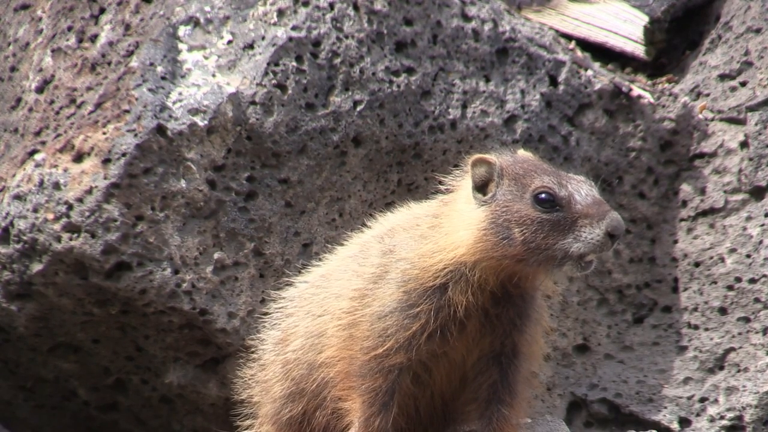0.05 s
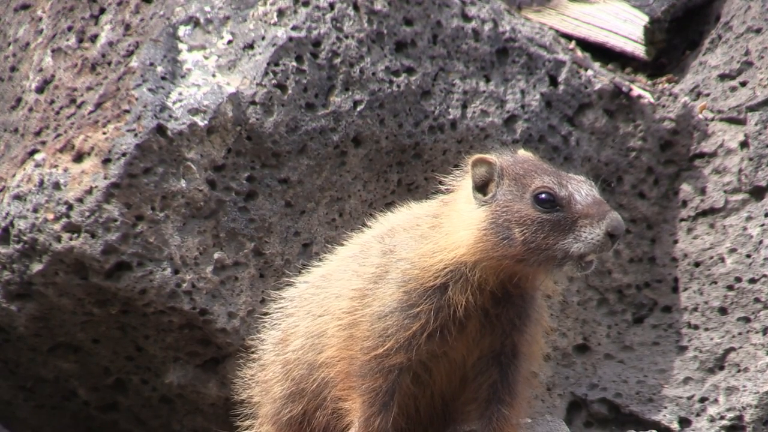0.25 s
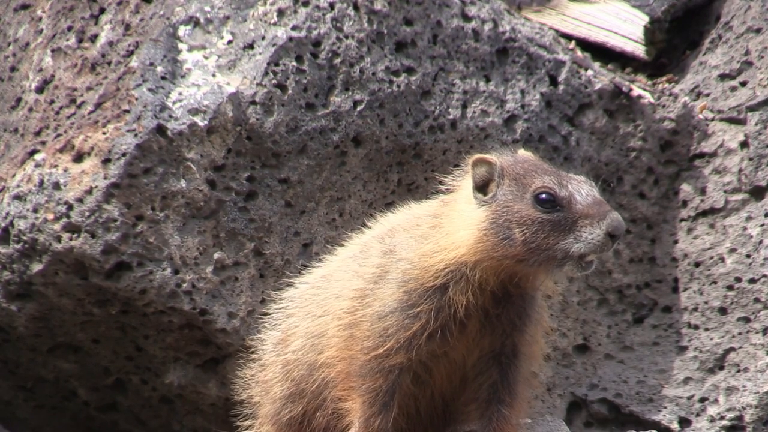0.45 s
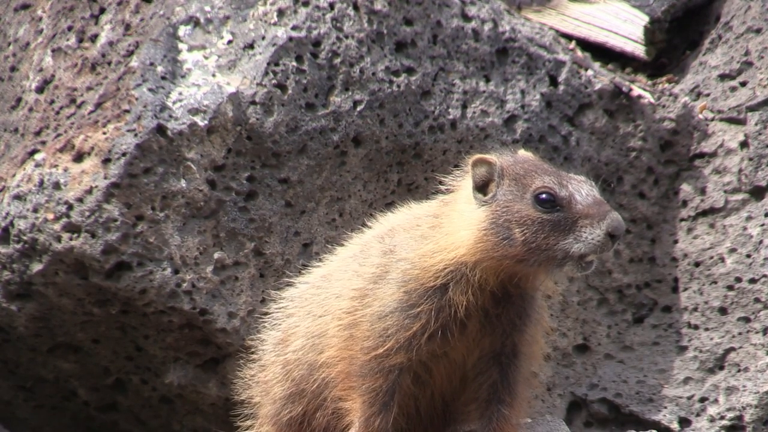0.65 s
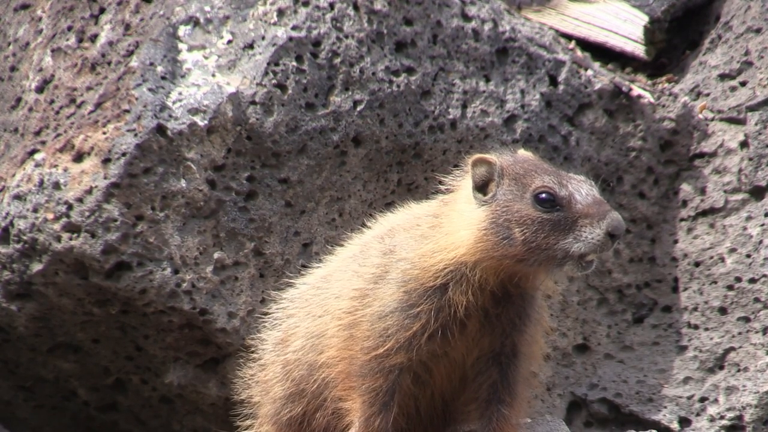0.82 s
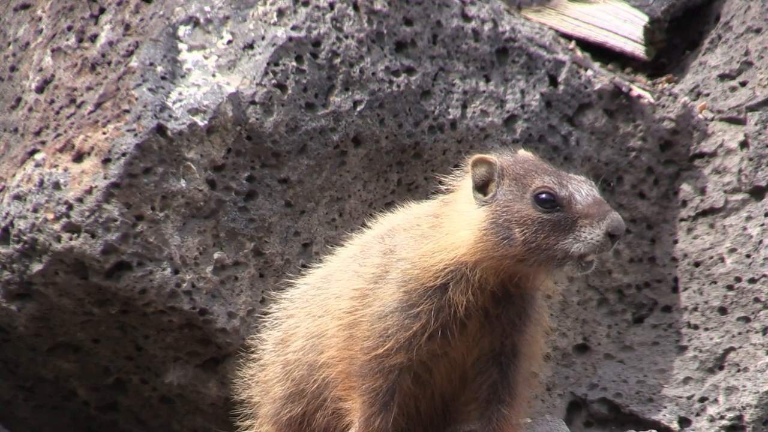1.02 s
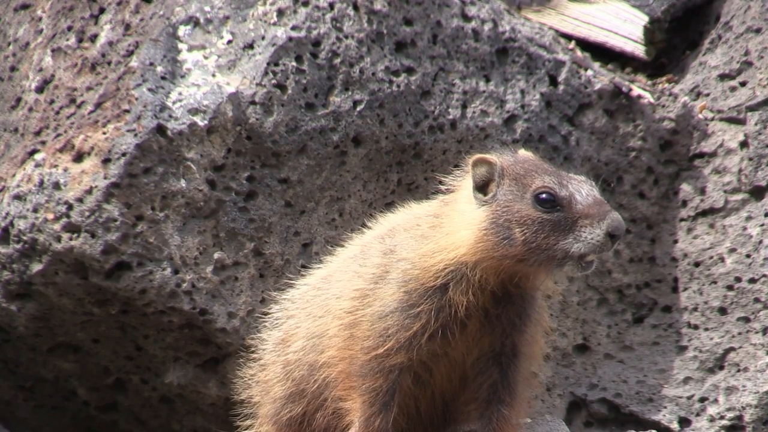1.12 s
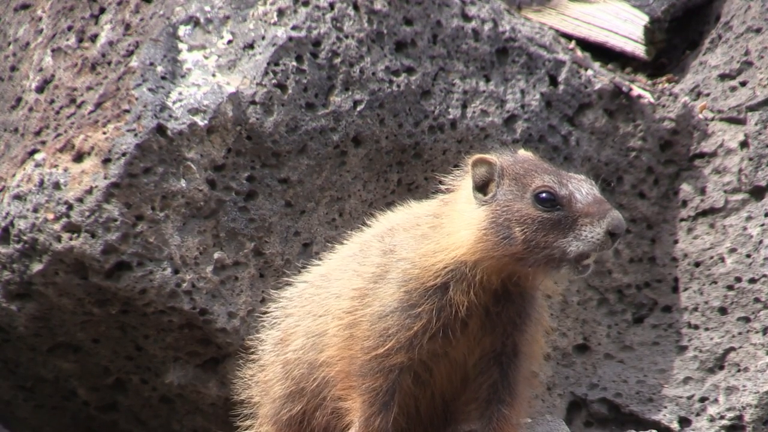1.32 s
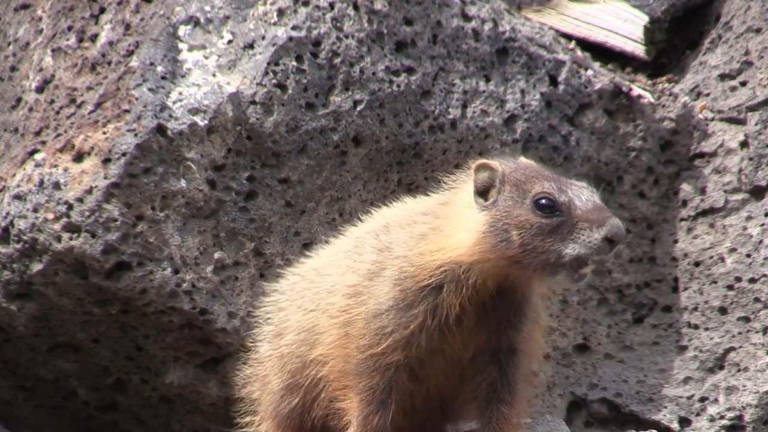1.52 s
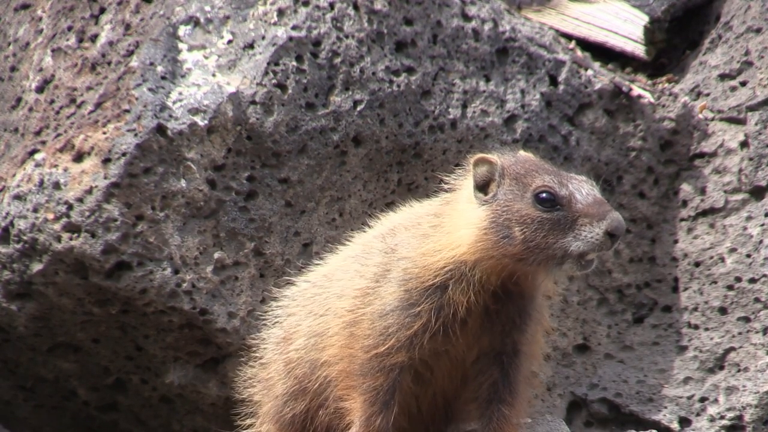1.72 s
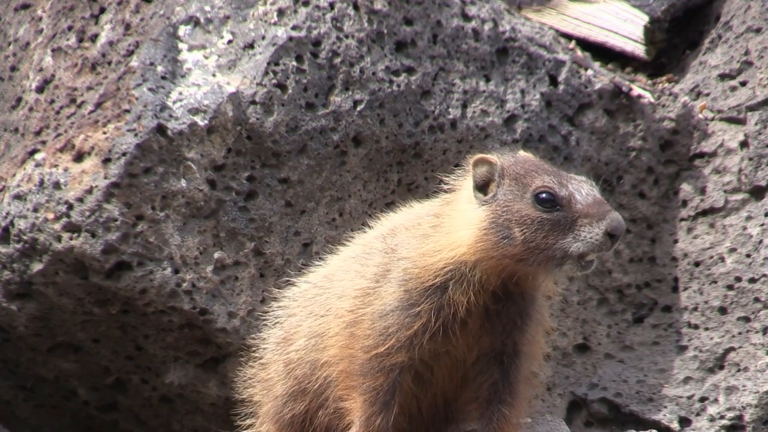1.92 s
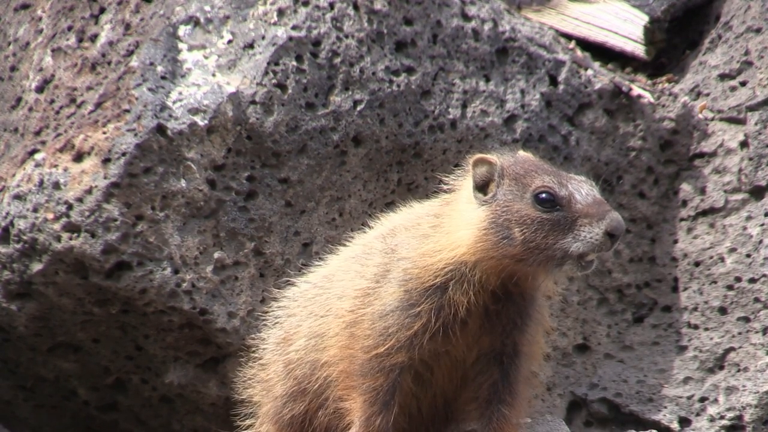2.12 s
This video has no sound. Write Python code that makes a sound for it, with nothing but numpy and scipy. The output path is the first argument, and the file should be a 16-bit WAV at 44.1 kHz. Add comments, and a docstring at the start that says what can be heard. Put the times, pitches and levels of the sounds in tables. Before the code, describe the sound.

A marmot's single piercing alarm chirp at about 1.67 s, only a twentieth of a second long, high then plunging in pitch, with echoes from rocks and slopes fading quickly. From 0 s, low wind buffets the microphone, gusting around 0.3 and 1.0-1.5 s, then easing. Faint distant birds pipe and twitter during the first second, over soft rustle, faint low hoots, a thin motor whine and steady hiss mostly on the right.

```python
"""Wind rumbles on the microphone from the start, as low noise shaped by a gust curve, over a far rustle
of noise bands, a camera motor's steady tones, and faint far bird notes and low hoots made of gliding sines.
Near 1.67 s a marmot on lava rocks gives one sharp whistled chirp: three harmonics and breath noise.
Its echoes from rocks, slopes and valley follow, by convolution with pulses and decaying noise.
The left channel passes through a gain control; the open right input only hisses throughout."""
import sys
import numpy as np
from scipy import signal
from scipy.fft import rfft, irfft
from scipy.io import wavfile
from scipy.ndimage import uniform_filter1d

SR = 44100
rng = np.random.default_rng(int(sys.argv[2]) if len(sys.argv) > 2 else 0)


def waveform_to_disk(signal):
    """Save audio, clipped to [-1, 1], as 16-bit WAV at the path in sys.argv[1]."""
    frames = np.transpose(np.atleast_2d(signal))
    scaled = np.clip(frames, -1, 1) * 32767
    samples = np.round(scaled).astype(np.int16)
    wavfile.write(sys.argv[1], SR, samples)


N = 94815

HISS_DB, HISS_BASS_DB, HISS_BASS_HZ = -58, -76.5, 45  # white part, bass part (both rms), bass upper edge
WHINE_WAVER_DB = -2  # dB per unit of drift
NOISE_LEVEL_VARIATION_DB = 1.2  # slight level variation of the noise bands
AIR_FOLLOWS_WIND, AIR_LAG_S = 0.22, .3  # dB of rustle per dB of slow wind; averaging time
WIND_LUMPS_DB = 2.5  # level variation of the rumble bands
WIND_BRIGHTENS, WIND_SPLIT_HZ = 0.13, 69  # extra dB of the upper rumble per dB of gust; where it begins
WIND_PORT_DB = 11.5  # sensitivity of the capsule to wind
PIPING_FLUTTER_DB, PIPING_TAIL_DB, PIPING_TAIL_T60_S = 1.5, -2, 1.2
SONG_FLUTTER_DB, SONG_BEND = 4, .05
SCATTER_DB, SCATTER_T60_S, SCATTER_ONSET_S = -15, .055, .005
VALLEY_DB, VALLEY_T60_S, VALLEY_ONSET_S = -32.5, 0.86, .03
AIR_DB_PER_S_AT_10K = 68  # treble lost on the way
ECHO_PEAK_HZ, ECHO_PEAK_WIDTH_HZ, ECHO_PEAK_DB = 4400, 400, 3  # slopes return the top of the whistle best
ECHO_LOW_HZ = 2900  # lower pitches return weakly
BREATH_LOW_HZ, BREATH_HIGH_HZ = 2600, 12600
BREATH_DB, BREATH_RISE_DB_PER_S = -38, 399  # at the start, relative to the fundamental; growth through the call
AGC_THRESHOLD_DB, AGC_SHARE = -36.5, 0.29  # share: dB of ducking per dB above the threshold
AGC_ATTACK_S, AGC_RELEASE_DB_PER_S = 0.0053, 39
CUTOFF_HZ = 15780


def amp(db):
    """Level law: amplitude ratio is ten to the power of decibels over twenty."""
    return 10 ** (np.asarray(db) / 20)


def drift(rate):
    """Low-pass random process: noise through a double pole at rate [Hz], scaled to unit deviation."""
    step = 40  # samples between computed points
    pole = np.exp(-2 * np.pi * rate * step / SR)
    noise = rng.standard_normal(N // step + 2002)
    slow = signal.lfilter([1], [1, -2 * pole, pole * pole], noise)[2000:]  # drop the settling time
    return np.interp(np.arange(N) / step, np.arange(len(slow)), slow / slow.std())


def coloured(spectrum, variation_db, rate):
    """Spectral shaping: noise of given density [dB per Hz] in half-octave bands that vary partly alone."""
    hz, db = np.transpose(spectrum)
    f = np.maximum(np.fft.rfftfreq(N, 1 / SR), 1)
    density = amp(np.interp(np.log(f), np.log(hz), db, left=-140))
    spec = rfft(rng.standard_normal(N)) * density * np.sqrt(SR / 2)
    place = 2 * np.log2(f / 10)  # half-octaves above 10 Hz
    together = drift(rate / 2)
    out = np.zeros(N)
    for k in range(23):
        band = np.cos(np.pi / 2 * np.clip(place - k, -1, 1)) ** 2
        band_db = variation_db * (0.56 * together + drift(rate))
        out += irfft(spec * band, N) * amp(band_db)
    return out


def glides(rows, bend=0, flutter_db=0):
    """Frequency modulation: sines whose phase integrates a glide, under a rounded, fluttering envelope."""
    out = np.zeros(N)
    for start, length, from_hz, to_hz, db in rows:
        u = np.linspace(0, 1, int(length * SR))
        i = int(start * SR)
        # a positive bend slows the glide mid-way
        hz = from_hz + (to_hz - from_hz) * (u + bend * np.sin(2 * np.pi * u))
        envelope = np.sqrt(2) * amp(db) * np.sqrt(np.sin(np.pi * u))
        out[i:i + len(u)] += envelope * np.sin(2 * np.pi * np.cumsum(hz) / SR)
    return out * amp(flutter_db * drift(110))


def decay_energy(t60):
    """Exponential decay: summed power, in samples, of a unit-power tail that falls 60 dB in t60 [s]."""
    return t60 * SR / np.log(1e6)


def hiss():
    """Amplifier noise: a flat spectrum with a slight bass rise."""
    white, low = rng.standard_normal((2, N))
    bass_band = signal.butter(1, [15, HISS_BASS_HZ], "band", fs=SR, output="sos")
    low = signal.sosfilt(bass_band, low)
    return amp(HISS_DB) * white + amp(HISS_BASS_DB) * low / low.std()


def whine():
    """Line spectrum: steady motor tones whose levels waver independently."""
    # camera motor tones: (frequency [Hz], rms level before wavering [dB])
    tones = [(719.6, -58), (839.8, -70), (959.5, -75), (1439.3, -64.5)]
    t = np.arange(N) / SR
    out = np.zeros(N)
    for hz, db in tones:
        level = np.sqrt(2) * amp(db + WHINE_WAVER_DB * drift(5))
        out += level * np.sin(2 * np.pi * (hz * t + rng.random()))
    return out


def gusts():
    """Turbulence envelope: wind level [dB] joined linearly between points in time."""
    # wind before the capsule's sensitivity: (time [s], level [dB])
    gust_points = [(0.0, -41.5), (0.04, -33), (0.14, -36), (0.32, -24.5), (0.35, -31.5), (0.98, -32),
                   (1.01, -28.5), (1.05, -30), (1.08, -26.5), (1.17, -32), (1.23, -26), (1.27, -30),
                   (1.35, -27), (1.42, -34), (1.47, -27.5), (1.51, -38), (1.55, -33.5), (1.58, -42.5),
                   (1.63, -39.5), (1.72, -43), (1.86, -43), (1.89, -54), (2.13, -48.5), (2.15, -65.5)]
    s, db = np.transpose(gust_points)
    return np.interp(np.arange(N) / SR, s, db)


def rustle():
    """Broadband noise: a far rustle of air and leaves whose level follows the slow wind."""
    # mean spectrum of the rustle: (frequency [Hz], density [dB per Hz])
    rustle_spectrum = [(150, -103), (400, -85), (800, -89.5), (1500, -95), (2800, -100), (4500, -100),
                       (7000, -108), (11000, -116), (16000, -124)]
    slow_db = uniform_filter1d(gusts(), int(AIR_LAG_S * SR))
    swell = amp(AIR_FOLLOWS_WIND * (slow_db - slow_db.mean()))
    return coloured(rustle_spectrum, NOISE_LEVEL_VARIATION_DB, rate=27) * swell


def wind():
    """Turbulent pressure on the microphone: lumpy low noise whose upper part grows faster in gusts."""
    # shape of the rumble, overall level set apart: (frequency [Hz], relative density [dB per Hz])
    rumble_spectrum = [(8, -15), (26, 0), (55, 2.5), (110, -5), (180, -17.5), (280, -31), (450, -47.5),
                       (800, -78)]
    gust_db = gusts()
    rumble = coloured(rumble_spectrum, WIND_LUMPS_DB, rate=6.2)
    split = signal.butter(2, WIND_SPLIT_HZ, "high", fs=SR, output="sos")
    upper = signal.sosfiltfilt(split, rumble)
    lower = rumble - upper
    mixed = lower + upper * amp(WIND_BRIGHTENS * (gust_db - gust_db.mean()))
    return mixed / rumble.std() * amp(gust_db + WIND_PORT_DB)


def hoots():
    """Near-pure tones: short low hoots of almost steady pitch."""
    # hoots: (start [s], length [s], from [Hz], to [Hz], rms level at the crest [dB])
    hoot_notes = [(.095, 0.031, 519, 520, -53.5), (.45, 0.058, 475, 523, -54.5),
                  (2.01, 0.055, 510, 510, -64)]
    return glides(hoot_notes)


def linger(x):
    """Diffuse reverberation: convolution with exponentially decaying noise."""
    t = np.arange(SR) / SR
    decay = amp(PIPING_TAIL_DB - 60 * t / PIPING_TAIL_T60_S)
    reply = rng.standard_normal(SR) * decay / np.sqrt(decay_energy(PIPING_TAIL_T60_S))
    return signal.fftconvolve(x, reply)[:N]


def piping_birds():
    """Distant tones in a reverberant field: lower gliding calls plus their diffuse tail."""
    # calls before flutter: (start [s], length [s], from [Hz], to [Hz], rms level at the crest [dB])
    piping_notes = [(0.0, .02, 2280, 2320, -60), (.03, 0.054, 2060, 2264, -56.5),
                    (.045, 0.028, 2300, 2490, -55.5), (.1, 0.034, 2290, 2420, -58),
                    (.2, .05, 2380, 2480, -64), (.088, 0.07, 2066, 2304, -53),
                    (.14, .052, 2087, 2250, -56.5)]
    piping = glides(piping_notes, flutter_db=PIPING_FLUTTER_DB)
    return piping + linger(piping)


def songbirds():
    """Frequency-modulated whistles: faint notes that glide unevenly and flutter in level."""
    # notes before flutter: (start [s], length [s], from [Hz], to [Hz], rms level at the crest [dB])
    song_notes = [(0.0, 0.09, 4740, 4050, -62), (.402, 0.058, 6200, 5500, -70),
                  (.445, 0.039, 5100, 4440, -67), (.522, .055, 6100, 5430, -60.5),
                  (.627, 0.067, 4100, 5300, -58.5), (.713, 0.038, 5200, 4300, -61),
                  (.742, 0.043, 4300, 3950, -63), (.814, 0.084, 3900, 5620, -61.5),
                  (.924, 0.031, 4570, 3720, -60.5)]
    return glides(song_notes, SONG_BEND, SONG_FLUTTER_DB)


def far_echo(x):
    """Scattering and air absorption: spread returns from slopes and valley, duller the later they come."""
    # slopes further off: (delay [s], spread [s], energy relative to the call [dB])
    slope_returns = [(.045, 0.011, -28.5), (.092, .013, -33), (.155, .014, -42.5), (.225, .02, -46.5),
                     (.3, .015, -68)]
    t = np.arange(SR) / SR
    onset = 1 - np.exp(-(t / VALLEY_ONSET_S) ** 2)
    power = amp(2 * VALLEY_DB - 120 * t / VALLEY_T60_S) * onset / decay_energy(VALLEY_T60_S)
    for delay, spread, db in slope_returns:
        bump = np.exp(-.5 * ((t - delay) / spread) ** 2)
        power = power + amp(2 * db) * bump / (spread * SR * np.sqrt(2 * np.pi))
    f, ts, z = signal.stft(rng.standard_normal(SR) * np.sqrt(power), SR, nperseg=256)
    peak_db = ECHO_PEAK_DB * np.exp(-((f[:, None] - ECHO_PEAK_HZ) / ECHO_PEAK_WIDTH_HZ) ** 2)
    # absorption grows with travel time and the square of frequency
    absorbed_db = AIR_DB_PER_S_AT_10K * np.outer((f / 1e4) ** 2, ts)
    reply = signal.istft(z * amp(peak_db - absorbed_db), SR, nperseg=256)[1]
    reply = signal.sosfilt(signal.butter(2, ECHO_LOW_HZ, "high", fs=SR, output="sos"), reply)
    return signal.fftconvolve(x, reply)[:N]


def near_echo(x):
    """Early reflections: direct sound, a few clear bounces and a quick scatter from the rocks."""
    # clear bounces: (delay [s], level relative to the direct sound [dB])
    bounces = [(.0031, -13), (.0064, -17.5)]
    t = np.arange(SR // 8) / SR
    onset = np.minimum(t / SCATTER_ONSET_S, 1)
    decay = amp(SCATTER_DB - 60 * t / SCATTER_T60_S)
    reply = rng.standard_normal(len(t)) * onset * decay / np.sqrt(decay_energy(SCATTER_T60_S))
    reply[0] = 1  # direct sound
    for delay, db in bounces:
        reply[int(delay * SR)] += amp(db)
    return signal.fftconvolve(x, reply)[:N]


def marmot():
    """Harmonic whistle: three phase-locked partials on an arched pitch, with growing breath noise."""
    # the chirp: (time [s], pitch [Hz], fundamental [dB], second harmonic [dB], third harmonic [dB])
    chirp_points = [(1.67, 4000, -74, -81.5, -95), (1.6732, 4100, -36, -46, -58),
                    (1.6770, 4120, -5, -18.5, -46), (1.6784, 4185, -2, -12.5, -37.5),
                    (1.6803, 4140, 5.5, -12.5, -26.5), (1.6825, 4213, 5, -24, -34),
                    (1.6850, 4273, -3, -13.5, -29.5), (1.691, 4268, 3.5, -9.5, -27.5),
                    (1.6924, 4186, 7, -11.5, -26), (1.6977, 4063, 3.5, -8, -25),
                    (1.7013, 3740, 5.5, -15.5, -32), (1.705, 3315, 4.5, -5, -31.5),
                    (1.7053, 3190, 4, -15, -37), (1.7072, 3030, -12, -9, -40),
                    (1.7112, 2713, -7.5, -10, -29), (1.7129, 2320, -22.5, -20, -38),
                    (1.716, 1770, -36, -42.5, -57), (1.721, 1590, -48, -66, -77)]
    s, hz, *levels = np.transpose(chirp_points)
    t = np.arange(N) / SR
    phase = 2 * np.pi * np.cumsum(np.interp(t, s, hz)) / SR
    gains = [amp(np.interp(t, s, db, left=-200, right=-200)) for db in levels]
    whistle = sum(gain * np.sin((k + 1) * phase) for k, gain in enumerate(gains))
    breath_band = signal.butter(6, [BREATH_LOW_HZ, BREATH_HIGH_HZ], "band", fs=SR, output="sos")
    breath = signal.sosfilt(breath_band, rng.standard_normal(N))
    since_start = np.clip(t - s[0], 0, s[-1] - s[0])
    breath_gain = amp(BREATH_DB + BREATH_RISE_DB_PER_S * since_start) * gains[0]
    return whistle + breath_gain * breath


def scene():
    """Superposition: all sources add at the left input; the right holds its own hiss."""
    background = whine() + rustle() + wind()
    birds_and_hoots = hoots() + piping_birds() + songbirds()
    call = marmot()
    left = background + birds_and_hoots + far_echo(call) + near_echo(call)
    return np.array([left, hiss()])


def record(dry):
    """Dynamic compression: the left gain ducks quickly and returns slowly; a low-pass cuts both tops."""
    level = 10 * np.log10(uniform_filter1d(dry[0] ** 2, size=441) + 1e-12)  # 10 ms mean power
    excess_db = np.maximum(level - AGC_THRESHOLD_DB, 0)
    # a running maximum on a tilted axis lets the ducking fall only at the release rate
    fall = AGC_RELEASE_DB_PER_S * np.arange(N) / SR
    duck = np.maximum.accumulate(AGC_SHARE * excess_db + fall) - fall
    pole = np.exp(-1 / (AGC_ATTACK_S * SR))
    duck = signal.lfilter([1 - pole], [1, -pole], duck - duck[0]) + duck[0]
    out = np.array([dry[0] * amp(-duck), dry[1]])
    return signal.sosfilt(signal.ellip(12, .3, 55, CUTOFF_HZ, fs=SR, output="sos"), out)


dry = scene()
out = record(dry)
waveform_to_disk(out)
```